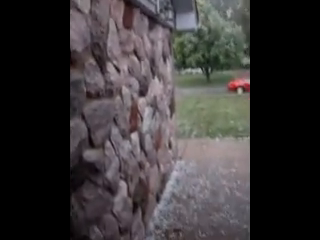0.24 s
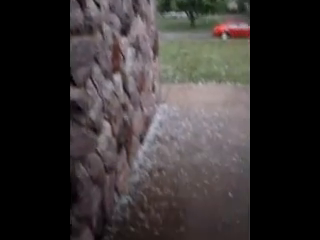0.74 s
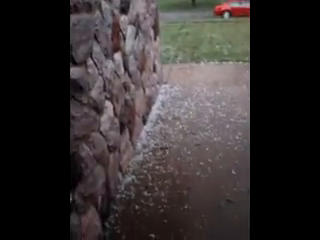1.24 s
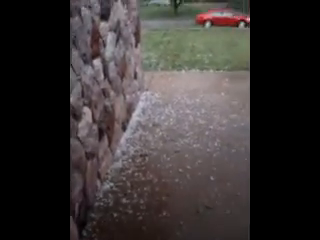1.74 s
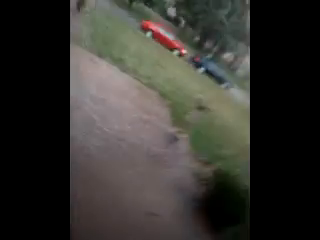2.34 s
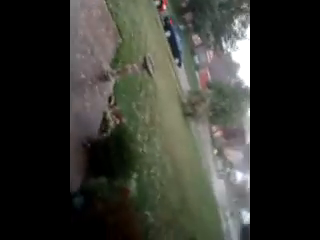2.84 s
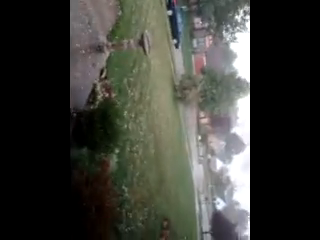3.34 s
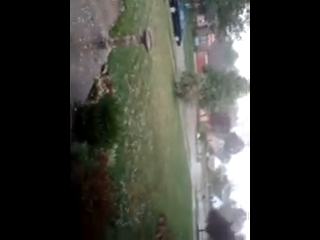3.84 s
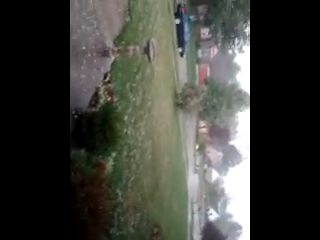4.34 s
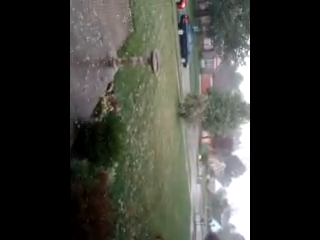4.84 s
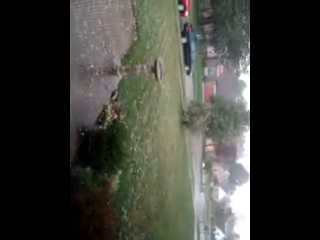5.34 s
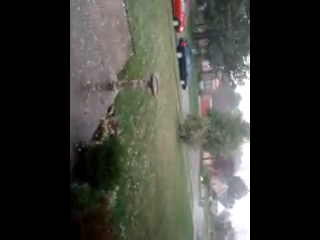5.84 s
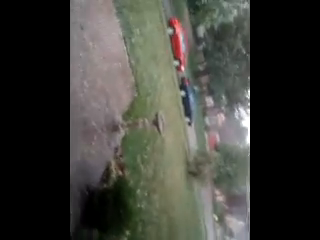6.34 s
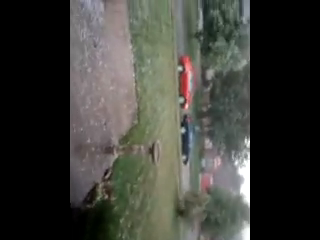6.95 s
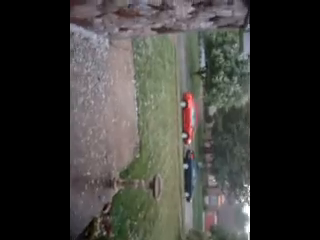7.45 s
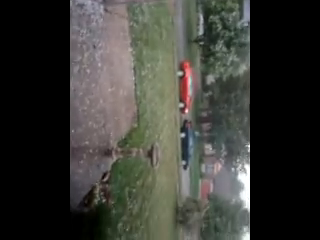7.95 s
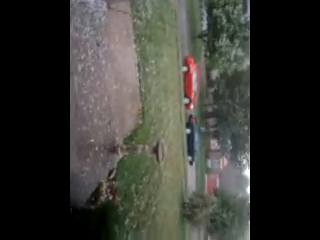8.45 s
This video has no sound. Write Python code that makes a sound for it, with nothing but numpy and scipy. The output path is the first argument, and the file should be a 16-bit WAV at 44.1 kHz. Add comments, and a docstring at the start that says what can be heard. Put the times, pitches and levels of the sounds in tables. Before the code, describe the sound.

A dense hiss of hail covers a lawn and street while big stones strike the concrete close to the microphone, many times a second. They crack, knock and burst into shards, with quick echoes off the wall and eaves, and some set hard objects ringing briefly. Small ticks, pings and a faint gutter drumming fill the gaps. The knocks grow heavier in the second half.

```python
"""Hail from under the eaves

Large hail on a concrete walk, a lawn and a street, on a phone under the eaves of a stone house.
Close by, stones snap on contact; shards and echoes off wall and eaves follow as a short gritty burst.
Some land with a solid knock or a bright clack, or set hard things ringing. The gutter drums overhead,
lighter stones tick and ping on the walk, drive and cars, and countless far ones merge into a hiss."""
import sys
import numpy as np
from scipy import signal
from scipy.fft import rfft, irfft, next_fast_len
from scipy.io import wavfile

SR = 44100
rng = np.random.default_rng(int(sys.argv[2]) if len(sys.argv) > 2 else 0)


def store_wav(level_fs):
    """Save 16-bit WAV to argv[1]."""
    pcm = np.round(np.clip(np.atleast_2d(level_fs), -1, 1) * 32767)
    wavfile.write(sys.argv[1], SR, pcm.T.astype(np.int16))


N = 384111
HIT_SIZE, TOP_HZ = 16384, 10080  # samples in one hit; top of the microphone's range
TIME, AGE = np.arange(N) / SR, np.arange(HIT_SIZE) / SR  # seconds into the scene; into one hit

# strength of the storm, for the far hail and the lighter stones: time_s, level_db
STORM_LEVEL = [(0.0, -35), (0.31, -37), (.6, -39.5), (0.8, -41), (0.95, -35), (1.2, -36.5), (1.7, -35),
               (1.98, -34), (2.12, -37), (2.75, -34.5), (3.13, -34), (3.56, -34), (3.87, -34.5),
               (4.07, -37), (4.2, -34.5), (4.87, -34), (5.22, -33), (5.33, -31), (5.52, -35.8),
               (5.68, -31.5), (6.0, -37.5), (6.3, -35), (6.94, -35), (7.16, -30.5), (7.62, -36), (7.8, -38),
               (8.3, -34), (8.71, -33.5)]
# colour of hail in the distance: frequency_hz, gain_db
FAR_COLOUR = [(30, -49), (100, -26.5), (180, -17), (260, -7), (350, -3.5), (550, 0.3), (1100, 4.5),
              (1600, 2.9), (2400, 3), (4100, 0), (6200, -4.5), (10000, -11.5)]
# colour of ice on hard ground: frequency_hz, gain_db
ICE_COLOUR = [(30, -55), (100, -36), (180, -27), (260, -15), (350, -2), (550, 6), (1050, 4.5), (1600, 1.5),
              (2300, 5), (4100, 1), (6200, 1), (10000, -4)]
# colour of the snap at contact: frequency_hz, gain_db
SNAP_COLOUR = [(30, -44), (200, -26), (700, 1), (2200, 6.5), (5000, 4), (10000, 0.5)]
# modes of the metal gutter overhead: pitch_hz, t60_s, level_db
GUTTER_MODES = [(236, 0.28, -18), (305.5, 1, 0.5), (397, 0.31, -2), (528, 0.45, -17), (608, 0.36, -1.5),
                (672.5, 0.75, 2), (1013, 0.33, 0), (2030, 0.25, -5)]
# stones that shatter close by: start_s, level_db, pitch_hz, t60_s
SHATTERING_STONES = [(.0742, -30.5, 8000, 0.24), (.1386, -30, 7600, .12), (.2304, -26, 3450, 0.23),
                     (.352, -26, 3470, 0.23), (.407, -28.5, 6000, 0.055), (.4485, -26, 5060, 0.43),
                     (.507, -24.5, 2230, 0.14), (.6854, -31, 3830, 0.72), (.887, -23.5, 5000, 0.048),
                     (.937, -29, 2500, 0.27), (1.0212, -24.5, 617, 0.17), (1.1294, -33.5, 7000, 0.25),
                     (1.285, -28, 1890, 0.57), (1.3735, -23, 1370, 0.41), (1.455, -26.5, 2880, 0.099),
                     (1.544, -28, 1810, 0.53), (1.8737, -26, 4370, 0.082), (1.909, -27.5, 2500, 0.26),
                     (2.038, -27, 8050, 0.15), (2.141, -23.5, 1550, 0.16), (2.2179, -29, 7500, 0.12),
                     (2.267, -30, 7450, 0.19), (2.4244, -24.5, 7000, 0.087), (2.4491, -28.5, 4500, 0.22),
                     (2.4666, -23, 2600, 0.16), (2.5594, -31, 5550, 0.13), (2.6546, -20, 2880, 0.16),
                     (2.8391, -29.5, 1690, 0.12), (2.972, -24, 2280, 0.21), (3.0314, -27, 3350, 0.11),
                     (3.2947, -26, 8900, 0.073), (3.3523, -35, 7500, 0.15), (3.4276, -27, 7500, 0.045),
                     (3.4642, -24, 3880, 0.1), (3.487, -21.5, 2800, 0.25), (3.569, -27.5, 5370, 0.13),
                     (3.5848, -24.5, 4270, 0.11), (3.6486, -30.5, 950, 0.62), (3.7314, -30, 5000, .15),
                     (3.897, -26.5, 3240, 0.31), (3.9208, -25, 2180, 0.16), (3.951, -23.5, 3500, 0.14),
                     (4.129, -26.5, 6000, 0.15), (4.2802, -29.5, 8100, 0.1), (4.4669, -28, 2210, 0.28),
                     (4.5303, -24.5, 1380, 0.18), (4.674, -28, 1810, .3), (4.7351, -26, 2020, 0.22),
                     (4.8148, -27, 1770, 0.57), (4.8875, -33, 1790, 0.46), (4.9479, -24, 3620, 0.16),
                     (5.0616, -24.5, 1580, 0.17), (5.139, -27, 4000, 0.1), (5.157, -25, 2420, 0.18),
                     (5.3583, -22, 1820, 0.17), (5.4535, -26.5, 5500, 0.071), (5.6009, -27.5, 1390, 0.7),
                     (5.6845, -30.5, 6040, 0.15), (5.7245, -28, 3420, 0.37), (5.776, -18, 864, 0.24),
                     (6.0501, -25, 9000, 0.061), (6.076, -27.5, 1510, 0.13), (6.2212, -23.5, 4500, 0.067),
                     (6.363, -31, 5930, 0.17), (6.3741, -26.5, 970, 0.13), (6.5909, -29, 7500, 0.11),
                     (6.6523, -31, 2270, 0.71), (6.772, -21.5, 986, 0.22), (6.851, -27.5, 2470, 0.2),
                     (6.9689, -22.5, 7360, 0.083), (7.0005, -27, 4800, 0.067), (7.029, -30.5, 2800, 0.55),
                     (7.14, -26, 5000, 0.1), (7.1779, -27, 1800, 0.099), (7.1994, -29, 3200, .12),
                     (7.2305, -21, 1910, 0.074), (7.2893, -25, 5360, 0.19), (7.4814, -29, 7300, 0.27),
                     (7.553, -24, 5350, 0.17), (7.7194, -31, 9000, .1), (7.7867, -31, 7500, 0.1),
                     (7.8494, -30, 6000, .1), (7.8653, -24, 2310, 0.15), (7.8885, -26.5, 990, 0.76),
                     (8.0036, -22.5, 2070, 0.097), (8.1679, -25, 1990, 0.19), (8.203, -28, 4500, 0.13),
                     (8.403, -28.5, 3570, 0.074), (8.4842, -25, 5970, 0.11), (8.5274, -23, 1990, 0.27),
                     (8.557, -27, 3500, 0.22), (8.593, -27, 6960, 0.13), (8.6492, -30.5, 6040, 0.071)]
# heavy stones that land whole: start_s, peak_db, pitch_hz, echo_db
KNOCKING_STONES = [(.13, -31, 894, -36.5), (.367, -29, 604, -37), (.463, -31.5, 556, -44),
                   (.5155, -18, 1180, -26), (1.0216, -16, 880, -33.5), (1.883, -27, 890, -35),
                   (2.1412, -19.5, 1360, -34), (2.169, -31.5, 1120, -34), (2.559, -30.5, 1560, -35),
                   (2.709, -24, 1000, -30.5), (2.8392, -20, 1500, -32), (3.106, -27, 770, -36.5),
                   (3.1986, -16, 2190, -28), (3.248, -20, 2100, -28.5), (3.63, -36, 565, -41.5),
                   (3.73, -21.5, 1380, -35), (4.405, -28.5, 1210, -31.5), (4.477, -23, 970, -29.5),
                   (4.5303, -14.5, 1690, -35), (4.651, -29, 1210, -36.5), (4.813, -23, 740, -35.5),
                   (4.965, -23, 700, -33.5), (5.039, -25, 1000, -34), (5.0618, -17, 1100, -24.5),
                   (5.0638, -10.5, 2400, -27.5), (5.109, -25, 793, -35.5), (5.387, -26.5, 700, -36.5),
                   (5.6002, -16, 2100, -29), (5.621, -25.5, 1210, -32), (5.7772, -18.5, 690, -31.5),
                   (5.792, -13, 1110, -27), (5.969, -35, 547, -40.5), (6.649, -20.5, 1530, -33),
                   (6.699, -30, 890, -35.5), (6.7645, -11.5, 1210, -28.5), (6.775, -18, 1700, -27.5),
                   (6.7912, -15, 1890, -26.5), (7.2308, -15.5, 1420, -29), (7.512, -23, 1000, -28.5),
                   (7.579, -26, 910, -35), (7.8655, -19, 1510, -29), (8.146, -24.5, 1400, -31.5),
                   (8.269, -30.5, 800, -35), (8.381, -28.5, 860, -38.5), (8.5278, -7.5, 2080, -29),
                   (8.538, -18.5, 1060, -23.5)]
# stones that land squarely on the concrete: start_s, peak_db, pitch_hz, echo_db
CLACKING_STONES = [(.2304, -17, 3070, -22), (.3462, -7, 3080, -33.5), (.4091, -14.5, 3850, -30),
                   (.4469, -19, 3200, -27), (.8592, -21, 3200, -27.5), (.8724, -12, 2830, -22.5),
                   (.9555, -19, 3040, -26), (.9598, -18.5, 2030, -23.5), (1.243, -20, 2960, -32),
                   (1.2883, -15, 2720, -41), (1.6444, -11, 2800, -29), (1.7803, -11.5, 4420, -27.5),
                   (1.814, -14, 2700, -28), (1.9136, -23, 3240, -41.5), (1.9922, -10.5, 2800, -37.5),
                   (2.4508, -14, 3350, -27), (2.9215, -17, 2980, -22), (3.088, -12, 3470, -33.5),
                   (3.3531, -14, 4500, -26.5), (3.4644, -7, 2600, -31), (3.685, -18, 2410, -32),
                   (3.944, -12, 3300, -39), (4.098, -17.5, 3300, -31), (4.129, -10, 3080, -27),
                   (4.347, -17.5, 1780, -35), (4.438, -13, 2300, -35.5), (4.4702, -12, 4120, -31.5),
                   (5.1935, -16, 3350, -47), (5.2045, -11, 3400, -31.5), (5.254, -10, 2470, -26),
                   (5.7762, -13, 1800, -32.5), (6.0765, -22, 2220, -39), (6.2215, -17, 2610, -22.5),
                   (6.4429, -21.5, 2820, -27.5), (7.2312, -9, 1890, -38), (7.356, -16, 2160, -27),
                   (7.7126, -13.5, 4500, -37), (7.8073, -10, 1780, -39), (8.0044, -7.5, 3000, -31.5),
                   (8.0831, -11.5, 3520, -47), (8.246, -16, 4200, -25.5), (8.4311, -10.5, 4720, -26.5)]
# hard or hollow things set ringing by a stone: start_s, pitch_hz, level_db, t60_s
STRUCK_THINGS = [(0.513, 1670, -28, 0.08), (1.0215, 586, -29, 0.24), (1.375, 560, -31.5, 0.18),
                 (1.38, 3930, -19.5, 0.075), (1.399, 208, -45, 0.45), (1.402, 354, -31.5, .16),
                 (1.406, 1880, -22, .07), (1.561, 1614, -23.5, .08), (2.8392, 783, -27.5, 0.13),
                 (2.9236, 1770, -24, 0.095), (3.199, 510, -27.5, 0.094), (3.2, 1925, -24, .08),
                 (3.494, 1964, -24.5, 0.23), (3.494, 238.6, -49, .7), (3.6187, 3510, -19.5, 0.048),
                 (4.357, 675, -33.5, 0.2), (4.504, 1195, -24.5, 0.12), (4.5311, 1000, -26, 0.19),
                 (4.8883, 2060, -19, 0.094), (5.062, 2605, -19, 0.065), (5.0621, 1000, -28, 0.14),
                 (5.328, 4080, -24.5, 0.16), (5.3586, 583, -27, 0.1), (5.359, 2660, -21, .07),
                 (5.6002, 599, -26, 0.21), (5.752, 1330, -21.5, 0.077), (5.7767, 1040, -20, 0.12),
                 (5.778, 620, -34, .1), (5.802, 460, -31, 0.12), (6.075, 1070, -28.5, 0.24),
                 (6.087, 1520, -25.5, 0.13), (6.5467, 2160, -26.5, 0.13), (6.6518, 610, -31, 0.19),
                 (6.765, 1143, -13.5, 0.06), (6.771, 368, -32, 0.084), (6.97, 1186, -24, 0.19),
                 (7.2308, 775, -18, 0.055), (7.288, 3720, -14.5, 0.081), (7.29, 3060, -18, .04),
                 (7.29, 5280, -19, 0.04), (7.8654, 578, -24, 0.11), (8.5277, 2190, -23, 0.1),
                 (8.528, 347, -31, 0.085)]


def undb(db):
    """Decibels to gain."""
    return 10 ** (np.asarray(db) / 20)


def unit(x):
    """Scale to rms 1."""
    return x / np.sqrt(np.mean(x ** 2))


def fade(t60):
    """Exponential decay over the length of one hit."""
    return np.exp(-np.log(1000) * AGE / max(t60, 1 / SR))


def octaves(size):
    """Log frequency of each bin of a spectrum."""
    return np.log2(np.maximum(np.arange(size // 2 + 1) * SR / size, 1))


def colour(points, size):
    """Gain of each bin from a colour table, 20 dB lower above TOP_HZ."""
    hz, db = np.transpose(points)
    gain = undb(np.interp(octaves(size), np.log2(hz), db))
    return gain * np.where(octaves(size) < np.log2(TOP_HZ), 1, 0.1)


def hump(hz, width):
    """Bell-shaped gain round one pitch, width in octaves."""
    return np.exp(-.5 * ((octaves(HIT_SIZE) - np.log2(hz)) / width) ** 2)


def pulse(gain):
    """The sharpest causal pulse with this spectrum, peak 1."""
    cepstrum = irfft(np.log(gain + gain.max() * np.finfo(np.float32).eps))
    cepstrum[1:HIT_SIZE // 2] *= 2
    cepstrum[HIT_SIZE // 2 + 1:] = 0
    wave = irfft(np.exp(rfft(cepstrum)))
    return wave / np.abs(wave).max()


def grit(size, per_s, spread_db):
    """Randomly timed ticks of scattered strength and either sign."""
    struck = rng.random(size) < per_s / SR
    return struck * rng.choice([-1, 1], size) * undb(spread_db * np.minimum(rng.standard_normal(size), 2))


def spray(gain, shape, per_s, spread_db=3):
    """Coloured grit under an envelope, with the envelope's energy."""
    burst = irfft(rfft(grit(HIT_SIZE, per_s, spread_db)) * gain) * shape
    return burst * np.sqrt(np.sum(shape ** 2) / np.sum(burst ** 2))


def wander(db, per_s):
    """Gain that glides between random levels through the scene."""
    knots = rng.standard_normal(N // 20)
    return undb(db * np.interp(TIME * per_s, np.arange(len(knots)), knots))


def ripple(position, db):
    """Smooth random gain with a new level at each whole position."""
    knots = rng.standard_normal(HIT_SIZE)
    return undb(db * np.interp(position, np.arange(HIT_SIZE), knots))


def resonances(db, per_octave):
    """The random spectral peaks and dips of one landing spot."""
    return ripple(octaves(HIT_SIZE) * per_octave, db)


def add(out, start_s, sound):
    """Mix a sound in at its start time."""
    start = int(np.clip(start_s * SR, 0, N - 1))
    out[start:start + len(sound)] += sound[:N - start]


def far_hail(bands=8):
    """Thousands of distant impacts a second; each size of stone, an octave band, has its own flurries."""
    size = next_fast_len(N)
    centres = np.log2(TOP_HZ) - np.arange(bands)
    pitch = np.maximum(octaves(size), centres[-1])
    hiss, out = colour(FAR_COLOUR, size), 0
    for centre in centres:
        band = np.sqrt(np.maximum(1 - np.abs(pitch - centre), 0))
        impacts = grit(size, per_s=3500, spread_db=5)
        out += irfft(rfft(impacts) * hiss * band)[:N] * wander(db=2.3, per_s=50)
    return unit(out * wander(db=0.65, per_s=28))


def small_stones(level_db=-11, echo_db=-20, echo_t60=0.0098):
    """Pea-sized stones and rebounds tick on the walk, each with a faint splash of echo."""
    ticks = grit(N, per_s=150, spread_db=7)
    echo_power = np.abs(signal.fftconvolve(ticks ** 2, fade(echo_t60) ** 2)[:N])
    echo = np.sqrt(echo_power) * rng.standard_normal(N)
    tick = pulse(colour(ICE_COLOUR, HIT_SIZE) * hump(3800, width=2.8))
    return undb(level_db) * unit(signal.fftconvolve(ticks + undb(echo_db) * echo, tick)[:N])


def pings(level_db, centre_hz, spread_octaves, t60, spread_db, count):
    """Scattered stones that each ring at a pitch of their own."""
    out = np.zeros(N)
    decay = fade(t60)[:HIT_SIZE // 4]
    for when, (pitch, size) in zip(rng.random(count), rng.standard_normal((count, 2))):
        hz = centre_hz * 2 ** (spread_octaves * np.clip(pitch, -2, 2))
        ping = decay * np.sin(2 * np.pi * hz * AGE[:len(decay)])
        add(out, when * N / SR, undb(spread_db * min(size, 2)) * ping)
    return undb(level_db) * unit(out)


def gutter(stones, level_db=-49, patter_share=0.5, detune=0.0155, lengths=4):
    """The gutter drums with its own patter and the near stones; each length is tuned a little apart."""
    out = 0
    for _ in range(lengths):
        tunings = 1 + detune * rng.standard_normal(len(GUTTER_MODES))
        metal = sum(undb(db) / np.sqrt(t60) * fade(t60) * np.sin(2 * np.pi * hz * tuning * AGE)
                    for (hz, t60, db), tuning in zip(GUTTER_MODES, tunings))
        blows = unit(stones) + patter_share * unit(grit(N, per_s=280, spread_db=3))
        out += signal.oaconvolve(blows * wander(db=3, per_s=4), metal)[:N]
    return undb(level_db) * unit(out)


def middling_stones(peak_db=6, echo_db=-8, spread_db=4, centre_hz=2900, spread_octaves=0.76, count=90):
    """Rows for knocks(): lighter stones that fall at chance moments, at a steady average rate."""
    starts = (np.arange(count) + rng.random(count)) / count * N / SR
    rows = []
    for start_s, (pitch, size) in zip(starts, rng.standard_normal((count, 2))):
        size_db = spread_db * min(size, 2)
        hz = min(centre_hz * 2 ** (spread_octaves * pitch), TOP_HZ)
        rows.append((start_s, peak_db + size_db, hz, echo_db + size_db))
    return rows


def shatters(stones, snap_db=8, crack_db=-11.5, shards_per_s=6000, clump_s=0.0066, rise_s=0.0042):
    """Close by: a snap at contact, a crack as the ice breaks, then a burst of shards and wall echoes."""
    out = np.zeros(N)
    ice, contact = colour(ICE_COLOUR, HIT_SIZE), colour(SNAP_COLOUR, HIT_SIZE)
    for start_s, level_db, hz, t60 in stones:
        tone = np.hypot(hump(hz, width=1.94), 0.07)  # big stones are dull, small ones bright
        spot = ice * tone * resonances(db=3, per_octave=4)
        sharpness = undb(0.5 * np.log2(hz / 1000))  # snap and crack gain 0.5 dB an octave
        snap = undb(snap_db) * pulse(contact * (tone + 0.27))
        crack = undb(crack_db) * spray(spot, fade(t60=0.045), shards_per_s)
        # echoes arrive in clumps, one for each face of the wall and eaves
        clumps = fade(t60) * ripple(AGE / clump_s, db=-2) * np.minimum(AGE / rise_s, 1)
        burst = spray(spot, clumps, shards_per_s)
        add(out, start_s, undb(level_db) * (sharpness * (crack - snap) + burst))
    return out


def knocks(stones, slap_s=0.0013, slap_db=-5, slaps=5):
    """A whole stone gives a few strong cycles; ground and wall slap them back, and the eaves echo."""
    out = np.zeros(N)
    for start_s, peak_db, hz, echo_db in stones:
        blow = pulse(hump(hz, width=0.55))
        lags = slap_s * np.cumsum(np.append(0, .5 + rng.random(slaps)))
        for bounce, lag in enumerate(lags):
            add(out, start_s + lag, undb(peak_db + slap_db * bounce) * blow)
        spot = hump(hz, width=0.6) * resonances(db=5, per_octave=6)
        add(out, start_s, undb(echo_db) * spray(spot, fade(t60=0.1), per_s=2000))
    return out


def clacks(stones, ice_share=0.15):
    """A square landing gives one hard, pitched tick; wall and eaves throw it back as a quick rattle."""
    out = np.zeros(N)
    ice = ice_share * colour(ICE_COLOUR, HIT_SIZE)
    for start_s, peak_db, hz, echo_db in stones:
        tick = pulse(hump(hz, width=1) + ice)
        spot = (hump(hz, width=0.45) + ice) * resonances(db=4, per_octave=6)
        echo = spray(spot, fade(t60=0.053), per_s=2500)
        add(out, start_s, undb(peak_db) * tick + undb(echo_db) * echo)
    return out


def rings(things, gain_db=-1.5, detune=0.0451, rise_s=0.002, rough_share=0.51, modes=7):
    """A struck thing rings briefly with close modes that beat; crumbling ice roughens the ring."""
    out = np.zeros(N)
    for start_s, hz, level_db, t60 in things:
        spread = np.linspace(-1, 1, modes)[:, None] + rng.standard_normal((modes, 1)) / 2
        shape = fade(t60) * (1 - np.exp(-AGE / rise_s))
        # one blow starts each mode at a random phase within half a cycle; they drift apart as they fade
        phases = np.pi * rng.random((modes, 1))
        ring = np.sin(2 * np.pi * hz * (1 + detune * spread) * AGE + phases).sum(0) * shape
        ring *= np.sqrt(np.sum(shape ** 2) / np.sum(ring ** 2))
        crumble = spray(hump(hz, width=0.23), shape, per_s=3000)
        rough_ring = (ring + rough_share * crumble) / np.hypot(1, rough_share)
        add(out, start_s, undb(level_db + gain_db) * rough_ring)
    return out


def scene(storm_db=0.28, far_db=-0.82):
    """Big stones land close by; the lighter ones and the far hiss rise and fall with the storm."""
    storm = undb(storm_db + np.interp(TIME, *np.transpose(STORM_LEVEL)))
    near = shatters(SHATTERING_STONES) + clacks(CLACKING_STONES) + knocks(KNOCKING_STONES)
    near += storm * knocks(middling_stones())
    drive = pings(level_db=-9, centre_hz=2520, spread_octaves=0.79, t60=0.085, spread_db=1.5, count=600)
    cars = pings(level_db=-19, centre_hz=2203, spread_octaves=0.65, t60=0.11, spread_db=3, count=220)
    patter = undb(far_db) * far_hail() + small_stones() + drive + cars
    return (near + rings(STRUCK_THINGS) + gutter(near) + storm * patter)[None]


def record(dry, bass_hz=85):
    """The phone's small microphone thins the bass; the top is cut steeply."""
    thin = signal.sosfilt(signal.butter(1, bass_hz, "highpass", fs=SR, output="sos"), dry)
    return signal.sosfilt(signal.ellip(12, .1, 60, TOP_HZ, fs=SR, output="sos"), thin)


dry = scene()
out = record(dry)
store_wav(out)
```